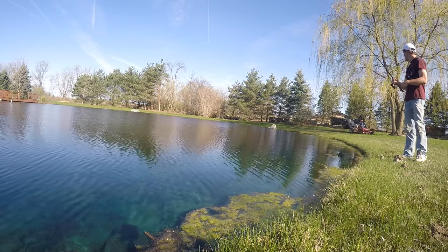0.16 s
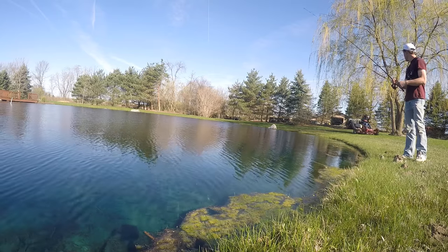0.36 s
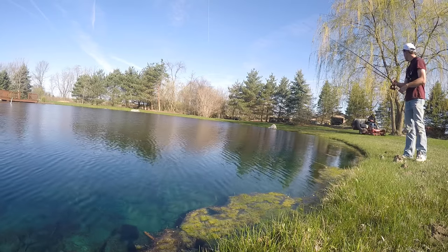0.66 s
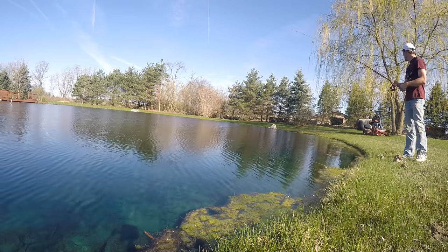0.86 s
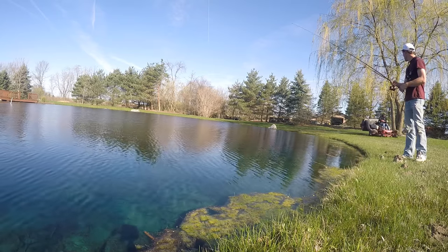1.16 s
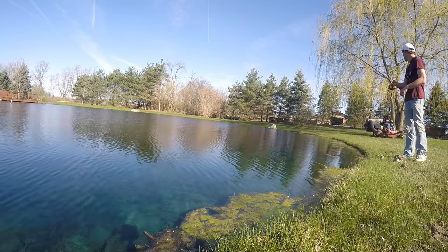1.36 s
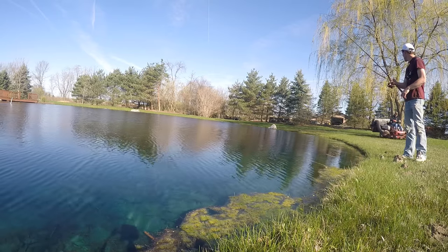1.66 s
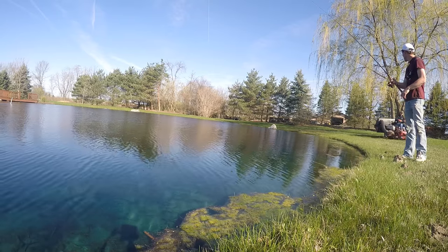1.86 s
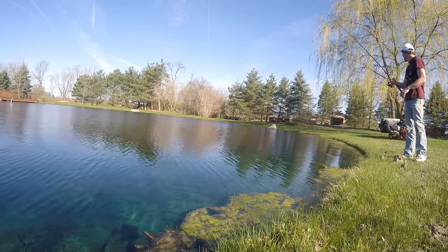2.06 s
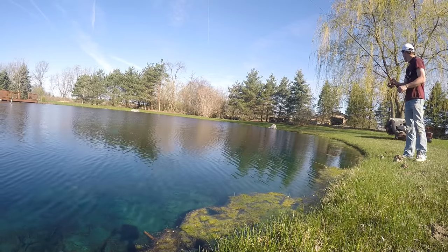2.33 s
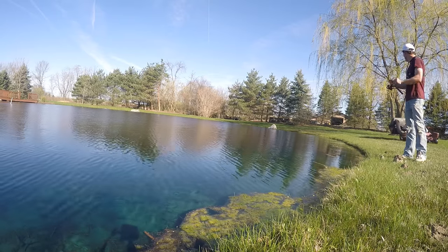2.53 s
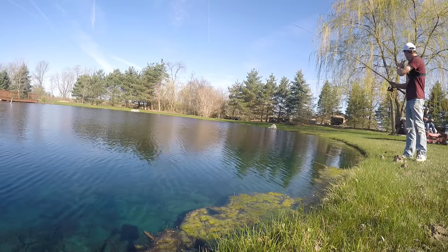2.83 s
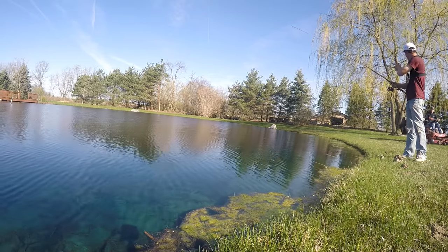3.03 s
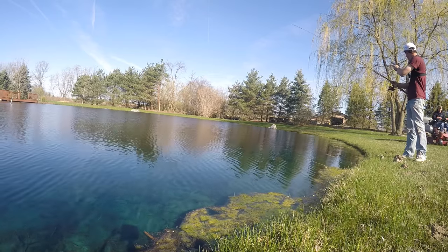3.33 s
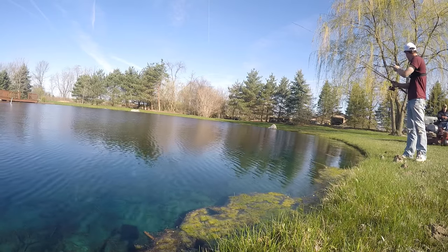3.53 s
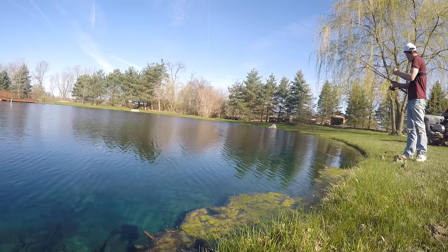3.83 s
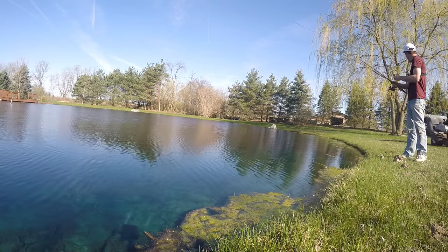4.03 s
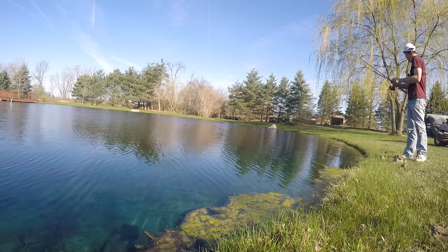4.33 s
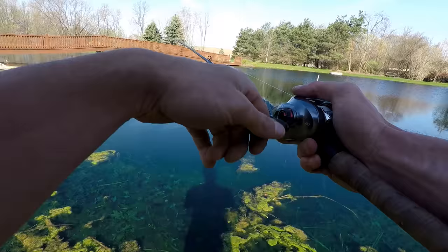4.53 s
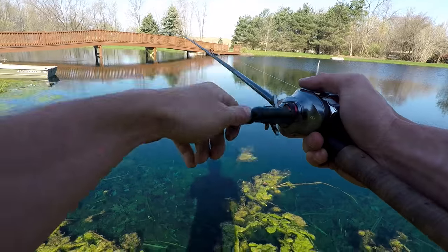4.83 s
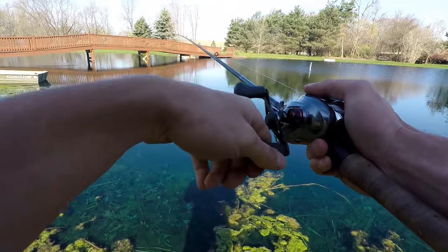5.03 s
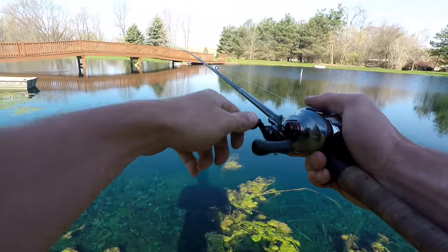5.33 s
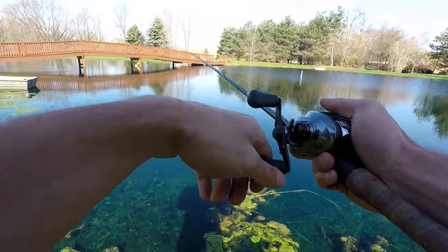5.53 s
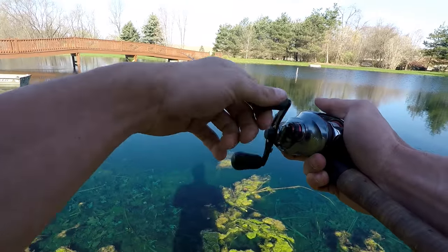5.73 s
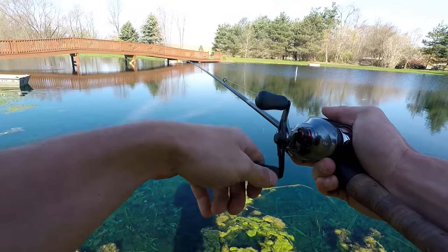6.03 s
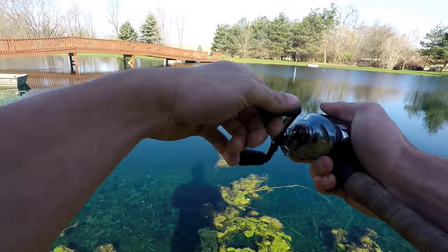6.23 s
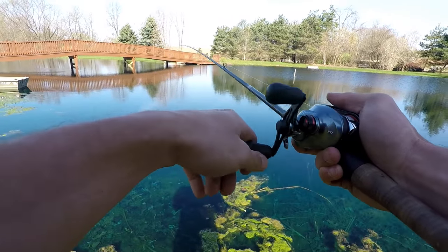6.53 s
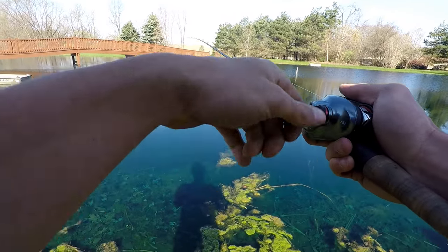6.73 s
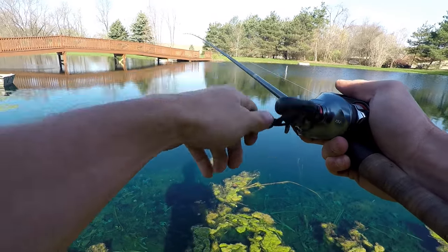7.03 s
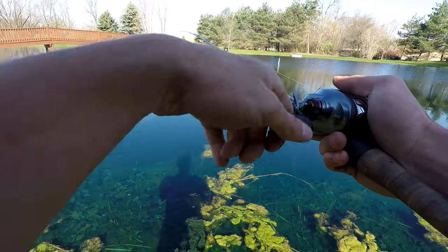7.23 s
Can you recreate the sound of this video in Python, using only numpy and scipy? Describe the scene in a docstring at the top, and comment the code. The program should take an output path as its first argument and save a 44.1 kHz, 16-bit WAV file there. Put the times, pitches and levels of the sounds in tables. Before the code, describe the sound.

Outdoors by a pond, a riding mower with an uneven twin-cylinder engine drones and rattles, slowly drawing nearer, while wind gusts thump dully on the microphone. After about four and a half seconds it cuts dead to a much quieter spot: soft open-air hiss, a wavering far engine hum and fine, bright ticks of a fishing reel close by. Near the end a gust thuds against the microphone.

```python
"""Mower and pond bank

A riding mower with an uneven twin-cylinder engine works on the bank while wind buffets the microphone:
firing impulses excite muffler resonances and modulate noise bands; eddies and gusts add dull pressure swings.
The scene jumps to a quiet spot: far engine hum (sinusoids), open-air hiss (shaped noise), a fishing reel
ticking (short resonant noise bursts), and a gust that thumps the microphone."""
import sys
import numpy as np
from scipy import signal
from scipy.fft import rfft, irfft
from scipy.io import wavfile

SR = 44100
rng = np.random.default_rng(int(sys.argv[2]) if len(sys.argv) > 2 else 0)


def file_out(sig):
    """Save sig as 16-bit WAV at sys.argv[1]."""
    # one column per channel
    cols = np.atleast_2d(sig).T
    # limit, then scale
    lim = np.clip(cols, -1, 1)
    pcm = np.round(lim * 32767).astype(np.int16)
    wavfile.write(sys.argv[1], SR, pcm)


N = 325413
TIME = np.arange(N) / SR
JUMP_S = 4.6075   # the scene changes to the quiet spot here


def amp(db):
    """Level to amplitude: 20 dB per factor of ten."""
    return 10 ** (np.asarray(db) / 20)


def unit(x):
    """Normalization to rms 1."""
    return x / np.sqrt(np.mean(x ** 2) + 1e-20)


def columns(rows):
    """Linear interpolation of each column of a time curve, sample by sample."""
    s, *rest = np.transpose(rows)
    return [np.interp(TIME, s, c) for c in rest]


def drift(rate_hz):
    """Slow random fluctuation of spread 1: noise through a double pole, drawn every 40 samples."""
    r = np.exp(-80 * np.pi * rate_hz / SR)
    noise = rng.standard_normal(N // 40 + 2002)
    slow = signal.lfilter([1], [1, -2 * r, r * r], noise)[2000:]   # the onset of the filter is dropped
    return np.interp(np.arange(N) / 40, np.arange(len(slow)), unit(slow - slow.mean()))


def low_pass(x, hz):
    """Double one-pole low-pass: inertia smooths fast changes."""
    r = np.exp(-2 * np.pi * hz / SR)
    return signal.lfilter([(1 - r) ** 2], [1, -2 * r, r * r], x + 1e-18)


def resonance(x, hz, width_hz):
    """Two-pole resonance with gain 1 at its peak."""
    r = np.exp(-np.pi * width_hz / SR)
    numerator = [(1 - r * r) / 2, 0, (r * r - 1) / 2]
    denominator = [1, -2 * r * np.cos(2 * np.pi * hz / SR), r * r]
    return signal.lfilter(numerator, denominator, x + 1e-18)


def coloured(spectrum, low_hz, high_hz):
    """Spectral shaping of noise, between two soft band edges; rms 1."""
    hz = np.maximum(np.fft.rfftfreq(N + 91, 1 / SR), 1)
    table = np.array(spectrum)
    shape = amp(np.interp(np.log(hz), np.log(table[:, 0]), table[:, 1]))
    edges = 1 / np.sqrt((1 + (low_hz / hz) ** 8) * (1 + (hz / high_hz) ** 8))
    return unit(irfft(rfft(rng.standard_normal(N + 91)) * shape * edges)[:N])


def add(out, s, level_db, hz, t60, width):
    """Exponential decay: adds resonant noise around one pitch, cut off after 0.2 s."""
    at, size = round(s * SR), round(.2 * SR)
    burst = unit(resonance(rng.standard_normal(size), min(hz, 15000), width * hz))
    decay_db = -60 * np.arange(size) / SR / max(t60, .002)
    burst = amp(level_db + decay_db) * burst / 2   # rms starts 6 dB under the level given
    out[at:at + size] += burst[:N - at]
    return out


def bursts(rows, width, *t60):
    """Superposition of decaying noise bursts, one for each row."""
    out = np.zeros(N)
    for row in rows:
        add(out, *row, *t60, width=width)
    return out


# engine speed: t/s, four-stroke cycle rate f/Hz
ENGINE_SPEED = [(0, 24.99), (.9, 24.73), (1.7, 24.99), (2.3, 25.42), (3.3, 25.77), (3.65, 25.76),
                (4.12, 26.44), (4.62, 25.17)]
CYCLE_START = .314   # share of a cycle already gone at the start


def engine_cycle():
    """Phase is the integral of frequency: cycles elapsed, with a speed that hunts a little."""
    return CYCLE_START + np.cumsum(columns(ENGINE_SPEED)[0]) / SR + .012 * drift(4)


SECOND_FIRING, SECOND_DB = .346, -3.8   # share of the cycle after the first cylinder, its strength


def firings(cycle, jitter_s, spread_db):
    """Impulse excitation: one click per cylinder firing, with random timing and strength."""
    clicks = np.zeros(N)
    for lag, db in ((0, 0), (SECOND_FIRING, SECOND_DB)):
        at = np.flatnonzero(np.diff(np.floor(cycle - lag)) > 0)
        timing, strength = rng.standard_normal((2, len(at)))
        at = at + np.round(jitter_s * SR * timing).astype(int)
        clicks[np.clip(at, 0, N - 1)] = amp(db + spread_db * strength)
    return clicks


# muffler resonances: f/Hz, width/Hz, relative level/dB
MUFFLER_MODES = [(20, 12, -10.5), (54.6, 15.7, -4), (131, 13.7, 0), (231, 110, -4), (98, 287, -10),
                 (462, 40, -17)]
# which way each chamber first swings: sign
MUFFLER_POLARITY = [1, -1, -1, 1, -1, 1]
EXHAUST_DB = -18.5   # at the start
CHAMBER_WAVER_DB, UPPER_FADE_DB_PER_S = .8, .5


def exhaust(clicks, nearer_db):
    """Forced resonance: each firing pushes gas into the muffler and rings its chambers."""
    push = low_pass(clicks, 240)   # the valve opens over a few milliseconds
    out = np.zeros(N)
    for sign, (hz, width_hz, db) in zip(MUFFLER_POLARITY, MUFFLER_MODES):
        level_db = db + CHAMBER_WAVER_DB * drift(3.0)   # each chamber wavers with the load
        if hz > 200:
            level_db = level_db - UPPER_FADE_DB_PER_S * TIME   # the pipe turns away
        out += sign * amp(level_db) * resonance(push, hz, width_hz)
    return amp(EXHAUST_DB + nearer_db) * unit(out)


# upper pipe resonances: f/Hz, width/Hz, relative level/dB
PIPE_MODES = [(980, 390, 0), (1470, 650, 1)]
GROWL_DB, GROWL_FOLLOWS = -63, 9.6   # level at the start, gain per dB of approach
GROWL_ROUGH = 1   # noise added to the firings, both of rms 1 before scaling


def growl(clicks, nearer_db):
    """Pipe resonance: firings and turbulent noise excite the upper modes, heard as the mower nears."""
    breath = unit(clicks) + GROWL_ROUGH * rng.standard_normal(N)
    modes = sum(amp(db) * unit(resonance(breath, hz, width_hz)) for hz, width_hz, db in PIPE_MODES)
    return amp(GROWL_DB + GROWL_FOLLOWS * nearer_db) * unit(modes)


# cooling fan: t/s, tone level/dB, overtone level/dB
FAN_LEVEL = [(0, -60, -53), (2.3, -40, -52), (2.7, -37.5, -46), (3.6, -37, -45.5), (4.0, -32.5, -37),
             (4.25, -24.5, -39), (4.6, -32.5, -44)]
VANES = 12   # a cycle
FAN_WAVER_DB, FAN_WOBBLE_RAD, THIRD_DB = 3.5, .9, -5   # the third harmonic is relative to the second


def fan(cycle):
    """Blade-passing tone: vanes per cycle set the fundamental, with two overtones."""
    tone_db, over_db = columns(FAN_LEVEL)
    phase = 2 * np.pi * VANES * cycle
    out = np.zeros(N)
    for k, db in ((1, tone_db), (2, over_db), (3, over_db + THIRD_DB)):
        level_db = db + FAN_WAVER_DB * np.tanh(drift(5))
        out += amp(level_db) * np.sin(k * phase + FAN_WOBBLE_RAD * drift(8))
    return out


ORDERS = range(13, 34)   # multiples of the cycle rate
ORDER_DB, ORDER_TILT_DB = -46.5, -.5   # lowest order at the start, change from one to the next
ORDERS_FOLLOW, ORDERS_WAVER_DB = 1.96, 7   # gain per dB of approach, bound of the waver


def engine_orders(cycle, nearer_db):
    """Harmonic series of a periodic machine: higher engine orders swell and sink."""
    out = np.zeros(N)
    for step, k in enumerate(ORDERS):
        db = ORDER_DB + ORDER_TILT_DB * step + ORDERS_FOLLOW * nearer_db
        db = db + ORDERS_WAVER_DB * np.tanh(drift(2.2))
        out += amp(db) * np.sin(2 * np.pi * k * cycle + 1.5 * drift(6))
    return out


# roar spectrum: f/Hz, relative spectral level/dB
ROAR_SPECTRUM = [(140, -78), (230, 8), (310, 4.5), (380, 1), (460, 1.5), (640, -7.5), (950, -11.5),
                 (1200, -16.5), (1600, -36), (3300, -49)]
ROAR_DB, ROAR_FOLLOWS = -32, 0.94   # level at the start, gain per dB of approach


def roar(puff, nearer_db):
    """Amplitude modulation of broadband noise by the firings."""
    level_db = ROAR_DB + ROAR_FOLLOWS * nearer_db
    return amp(level_db + 1.4 * puff + 1.2 * drift(5.3)) * coloured(ROAR_SPECTRUM, 190, 2000)


# treble spectrum: f/Hz, relative spectral level/dB
TREBLE_SPECTRUM = [(760, -3), (1300, 1.5), (2120, -2.5), (2330, -1.5), (3210, -6.5), (4620, -0.5),
                   (6940, 3.5), (7860, 0), (8540, 1.5), (14700, -12), (15600, -6.5)]
# whine: t/s, level/dB
WHINE_LEVEL = [(0, -34), (1.3, -37), (2.6, -40), (3.7, -39), (4.6, -35.5)]
# upper treble: t/s, hiss level/dB, sizzle level/dB
BRIGHT_LEVELS = [(0, -54, -41.5), (1.1, -32.5, -43), (1.4, -37, -41), (2.25, -36.5, -38),
                 (2.75, -41.5, -44.5), (3.6, -42.5, -43), (4.1, -38.5, -39), (4.6, -39, -41)]
# how hard the firings pulse the sizzle: t/s, depth/dB per unit of puff
SIZZLE_DEPTH = [(0, 4.5), (2.4, 5), (2.9, 2.5)]
# dips in the treble: f/Hz, width/Hz, level change/dB
TREBLE_DIPS = [(4070, 640, -3)]


def treble(puff):
    """Amplitude modulation in three noise bands: each firing's puff gates whine, hiss and sizzle."""
    whine_db, = columns(WHINE_LEVEL)
    hiss_db, sizzle_db = columns(BRIGHT_LEVELS)
    depth_db, = columns(SIZZLE_DEPTH)
    rattle = drift(20)   # the load on the blades flutters through all three bands
    out = amp(whine_db + 1.0 * puff + .5 * rattle) * coloured(TREBLE_SPECTRUM, 1696, 4220)
    out += amp(hiss_db + 1.8 * puff + 0.93 * rattle) * coloured(TREBLE_SPECTRUM, 2530, 6700)
    out += amp(sizzle_db + depth_db * puff + 0.24 * rattle) * coloured(TREBLE_SPECTRUM, 8100, 25000)
    for hz, width_hz, db in TREBLE_DIPS:
        out = out + (amp(db) - 1) * resonance(out, hz, width_hz)
    return out


RING_HZ, RING_WIDTH_HZ = 8600, 600
RING_DB, RING_FOLLOWS = -20, 2.2   # offset from the sizzle, gain per dB of sizzle depth


def high_ring(puff):
    """Narrow-band resonance of noise that swells in runs of firings, most where the sizzle pulses hardest."""
    _, sizzle_db = columns(BRIGHT_LEVELS)
    depth_db, = columns(SIZZLE_DEPTH)
    ring = rng.standard_normal(N)
    for _ in range(2):
        ring = resonance(ring, RING_HZ, RING_WIDTH_HZ)
    runs_db = 4 * unit(low_pass(puff, 25)) + 4 * drift(6)
    return amp(sizzle_db + RING_DB + RING_FOLLOWS * depth_db + runs_db) * unit(ring)


# engine cover resonances: f/Hz, width/Hz, relative level/dB
COVER_MODES = [(2415, 90, -3.5), (2560, 690, -8.5), (4010, 270, 0.5)]
COVER_DB, COVER_FADE_DB_PER_S = -41.5, 3   # the cover turns away


def cover(puff):
    """Modal vibration of a plate: noise shaken by the firings rings the engine cover."""
    shake = amp(5 * puff + 3.5 * drift(14)) * rng.standard_normal(N)
    modes = np.zeros(N)
    for hz, width_hz, db in COVER_MODES:
        mode = resonance(resonance(shake, hz, width_hz), hz, width_hz)
        modes += amp(db) * unit(mode)
    return amp(COVER_DB - COVER_FADE_DB_PER_S * TIME) * unit(modes)


APPROACH_DB_PER_S = .5   # the mower draws nearer


def mower():
    """Common timing: one cycle times the firings behind exhaust and noise bands, and pitches the tones."""
    cycle = engine_cycle()
    clicks = firings(cycle, jitter_s=.00015, spread_db=2.0)
    puff = unit(low_pass(clicks, 48)) - .8   # swells and falls in a few ms
    nearer_db = APPROACH_DB_PER_S * TIME
    out = exhaust(clicks, nearer_db) + growl(clicks, nearer_db)
    out += fan(cycle) + engine_orders(cycle, nearer_db)
    out += roar(puff, nearer_db) + treble(puff) + high_ring(puff) + cover(puff)
    return out + clinks() + slaps() + pings()


# wind by the mower and at the quiet spot: t/s, level/dB
WIND_LEVEL = [(0, -49), (.7, -22.5), (1.5, -26.5), (2.1, -30), (2.8, -24), (3.5, -29), (4.6, -53),
              (4.62, -36.5), (5.3, -37.5), (6.7, -38), (6.98, -29), (7.08, -11), (7.2, -25), (7.38, -29)]
FLUTTER_FOLLOWS = 0.77   # share of the wind's swing that the small eddies take on


def wind(edge_hz, lumps_db, flutter_db):
    """Turbulence at the microphone: large slow eddies buffet, small ones flutter; both come in lumps."""
    buffet_db, = columns(WIND_LEVEL)
    slope = [(8, 0), (30, -4), (edge_hz, -6), (4 * edge_hz, -22), (20000, -90)]
    lumps = lumps_db * drift(4.7)
    buffet = amp(buffet_db + lumps) * coloured(slope, 7, 46)
    flutter_level_db = flutter_db + FLUTTER_FOLLOWS * buffet_db + lumps
    return buffet + amp(flutter_level_db) * coloured(slope, 55.0, 480)


# loose part on the cover: t/s, level/dB, f/Hz
CLINK_EVENTS = [(0.006, -24.5, 2600), (0.16, -25, 2620), (0.205, -33, 2410), (0.243, -24.5, 2390),
                (0.287, -28, 2370), (0.332, -34, 2350), (0.362, -32, 3850)]


def clinks():
    """Impact and free decay: a loose part clinks on the cover."""
    return bursts(CLINK_EVENTS, .05, .12)   # t60 in s last


# sharp gust fronts: t/s, level/dB before the low-pass, centre f/Hz, t60/s
GUST_FRONTS = [(0.442, -13, 430, 0.22), (0.627, -8, 470, 0.14), (.7, -14, 384, 1), (.93, -13.5, 305, 1),
               (1.025, -5.5, 314, 0.45), (1.031, -10, 136, 0.34), (1.12, -11, 310, 0.77),
               (1.273, 3.5, 131, 0.16), (1.531, 2, 110, 0.28), (0.767, -4, 70, 0.53),
               (1.659, -4, 108, 0.47), (1.951, -5, 60, 0.16), (6.99, -25, 250, 0.28),
               (7.03, -29, 597, 0.093), (7.11, -24, 520, 0.16), (7.137, -29, 560, 0.1),
               (7.291, -41, 280, 0.26)]


def gusts():
    """Sudden onset and exponential decay: wind fronts hit the microphone all at once, dull on top."""
    out = np.zeros(N)
    for s, db, hz, t60 in GUST_FRONTS:
        front = add(np.zeros(N), s, db, hz, t60, width=.8)
        out += low_pass(front, 1.4 * hz)
    return out


# single strong eddies: t/s, peak level/dB, f/Hz, direction (1 pushes, -1 pulls)
EDDIES = [(0.594, -16, 90, 1), (0.834, -8.5, 70, 1), (0.888, -10, 88, -1), (0.998, -12, 80, 1),
          (1.029, -1.5, 160, -1), (1.118, -11, 88, 1), (1.246, -7.5, 56, -1), (1.274, -6, 140, -1),
          (1.297, -11, 70, 1), (1.4526, -11, 31, 1), (1.4723, -11, 140, -1), (1.5362, -9, 95, 1),
          (1.562, -0.5, 89, -1), (1.7156, -11, 23, 1), (1.966, -10, 55, 1), (3.221, -11, 43, -1),
          (7.003, -11.5, 17, 1), (7.0354, -13, 54, -1), (7.051, -9.5, 24, 1), (7.0834, -8, 33, 1),
          (7.114, -0.5, 72, -1), (7.142, -9.5, 120, -1), (7.162, -13.5, 10.6, -1), (7.226, -17, 53, -1),
          (7.315, -16.5, 52, 1), (7.331, -19, 21, -1)]
REBOUND = 1.43   # how far an eddy swings back


def thumps():
    """Pressure pulse: a single strong eddy moves the diaphragm in one dull swing."""
    out = np.zeros(N)
    for s, db, hz, direction in EDDIES:
        x = (TIME - s) * hz * np.pi
        out += np.sign(direction) * amp(db) * (1 - REBOUND * x ** 2) * np.exp(-x ** 2)
    return out


# debris: t/s, level/dB, f/Hz
SLAP_EVENTS = [(0.6265, -30, 2010), (0.7427, -23, 6200), (0.9393, -26, 1880), (1.0235, -28, 6800),
               (1.088, -20, 6850), (1.248, -29.5, 2300), (2.088, -25, 5450)]


def slaps():
    """Damped impact: debris slaps the deck in broad bursts around a pitch."""
    return bursts(SLAP_EVENTS, 0.44, 0.14)


# short pitched pings: t/s, level/dB, f/Hz
PING_EVENTS = [(1.036, -34, 12100), (1.812, -33, 1190)]


def pings():
    """Narrow resonance: small relative bandwidth gives a burst a clear pitch."""
    return bursts(PING_EVENTS, 0.024, 0.26)


# open-air hiss: f/Hz, relative spectral level/dB
AIR_SPECTRUM = [(110, 7), (150, 1), (200, -18), (280, -4.5), (360, -5), (560, -7), (800, -8.5), (1200, -12),
                (2200, -17), (3500, -24), (5800, -35), (10000, -38), (15600, -38)]
AIR_LEVEL_DB = -47


def open_air():
    """Spectrally shaped noise with a slight random fluctuation of level."""
    return amp(AIR_LEVEL_DB + 1.0 * drift(16)) * coloured(AIR_SPECTRUM, 102, 17000)


# far drone: t/s, f/Hz, level/dB
DRONE = [(4.62, 95.8, -49), (5.46, 97.86, -37.5), (6.63, 94.7, -40.5), (7.0, 94.9, -37)]
# far engine tones: f/Hz, level/dB before the common curve below
DISTANT_TONES = [(134.6, -52), (193.8, -57), (236.9, -57), (269.2, -52), (303, -56), (336, -55),
                 (403.7, -60), (436, -60), (667.5, -63)]
# the far tones sink and return: t/s, level change/dB
DISTANT_CURVE = [(4.62, 3), (5.3, 3), (6.2, -3.5), (6.75, -1.5), (7.38, 4.5)]


def far_engines():
    """Additive synthesis: a wavering drone and faint tones of fixed pitch."""
    drone_hz, drone_db = columns(DRONE)
    phase = 2 * np.pi * np.cumsum(drone_hz) / SR + .7 * drift(6)
    out = amp(drone_db + 2.5 * drift(9)) * np.sin(phase)
    curve_db, = columns(DISTANT_CURVE)
    for hz, db in DISTANT_TONES:
        level_db = db + curve_db + 0.67 * drift(4.0)
        out += amp(level_db) * np.sin(2 * np.pi * hz * TIME + rng.uniform(0, 2 * np.pi))
    return out


# gear ticks: t/s, level/dB before the high-pass
REEL_TICKS = [(4.8858, -40), (5.0626, -38), (5.2789, -39), (5.4819, -42), (5.8526, -46), (5.9145, -47),
              (6.0861, -50), (6.2427, -39), (6.3619, -47), (6.3929, -50), (6.4228, -47), (6.4398, -42),
              (6.5395, -45), (6.6546, -38), (6.76, -45), (7.0539, -43), (7.1636, -42)]
TICK_HZ, TICK_RISE_HZ_PER_S, TICK_SCATTER = 9700, 1300, 0.066   # ticks brighten as the line comes in
FAINT_DB, BODY_DB, BODY_HZ = -50, -6, 5000   # mean of the faint ticks, body relative to its tick


def reel():
    """Impulsive excitation of two resonances: bright gear ticks, with fainter, ever denser random ones."""
    faint_s = JUMP_S + (N / SR - JUMP_S) * np.sqrt(rng.random(30))
    faint = np.column_stack([faint_s, rng.normal(FAINT_DB, 3.4, 30)])
    ticks, body = np.zeros(N), np.zeros(N)
    for s, db in [*REEL_TICKS, *faint]:
        hz = TICK_HZ + TICK_RISE_HZ_PER_S * (s - JUMP_S)
        hz *= 1 + TICK_SCATTER * rng.standard_normal()
        add(ticks, s, db, hz, t60=.011, width=.45)
        add(body, s, db + BODY_DB, BODY_HZ, t60=0.0085, width=0.31)   # the reel body answers lower down
    ticks = signal.sosfilt(signal.butter(6, 8800, "high", fs=SR, output="sos"), ticks)
    body = signal.sosfilt(signal.butter(2, 3500, "high", fs=SR, output="sos"), body)
    return ticks + body


# rustles: t/s, level/dB, f/Hz, t60/s
RUSTLE_EVENTS = [(5.0, -50, 4600, 0.034), (6.166, -47.5, 4200, 0.13), (6.875, -53, 5300, 0.074)]


def rustles():
    """Band-limited noise with exponential decay: a few soft rustles."""
    return bursts(RUSTLE_EVENTS, .3)


def scene():
    """Superposition: the near mower up to the jump, the quiet spot after it, gusts and thumps over both."""
    near = mower() + wind(edge_hz=78, lumps_db=4.0, flutter_db=-7.5)
    quiet = open_air() + far_engines() + reel() + rustles()
    quiet += wind(edge_hz=56, lumps_db=0.5, flutter_db=-17.5)
    return (np.where(TIME < JUMP_S, near, quiet) + gusts() + thumps())[None]


CUTOFF_HZ = 15850


def record(dry):
    """Saturation and band limiting: peaks are rounded, the top is cut."""
    rounded = 1.2 * np.tanh(dry / 1.175)
    return signal.sosfilt(signal.cheby2(22, 70, CUTOFF_HZ, fs=SR, output="sos"), rounded)


dry = scene()
out = record(dry)
file_out(out)
```